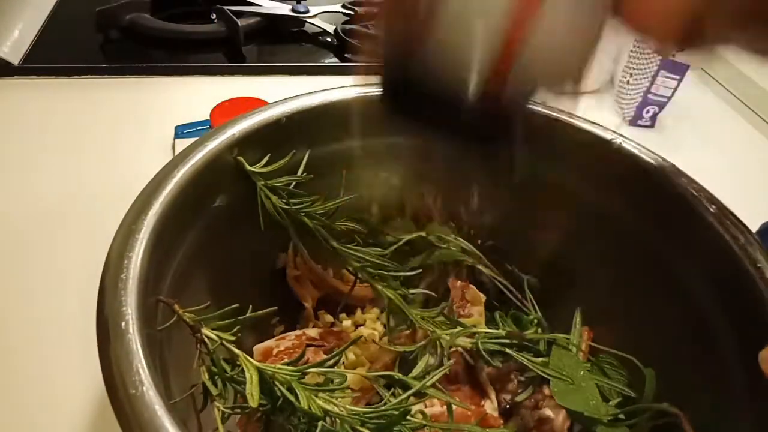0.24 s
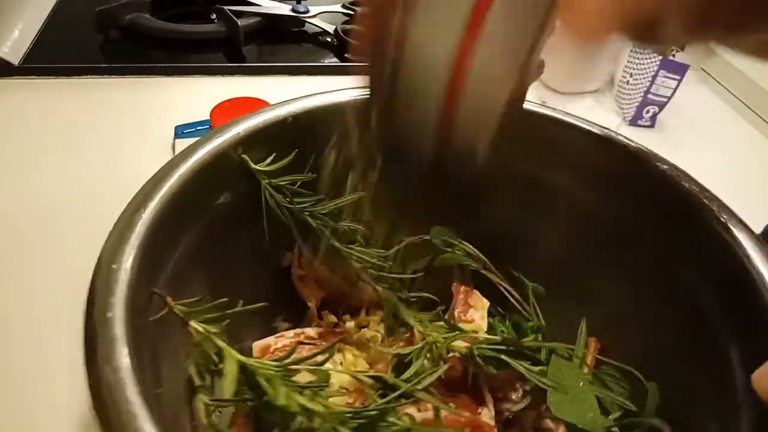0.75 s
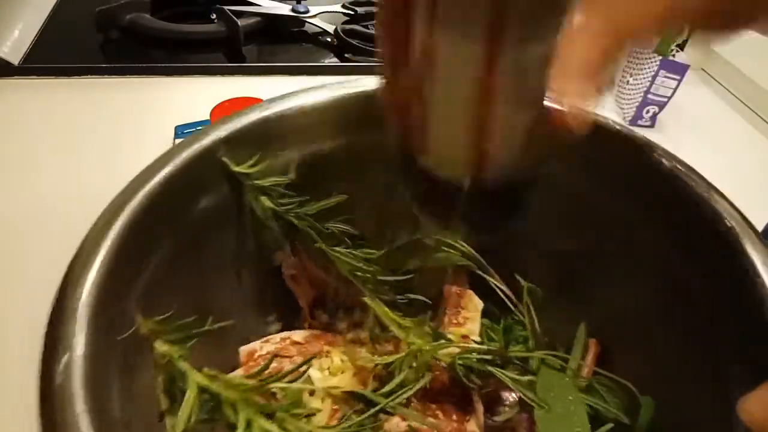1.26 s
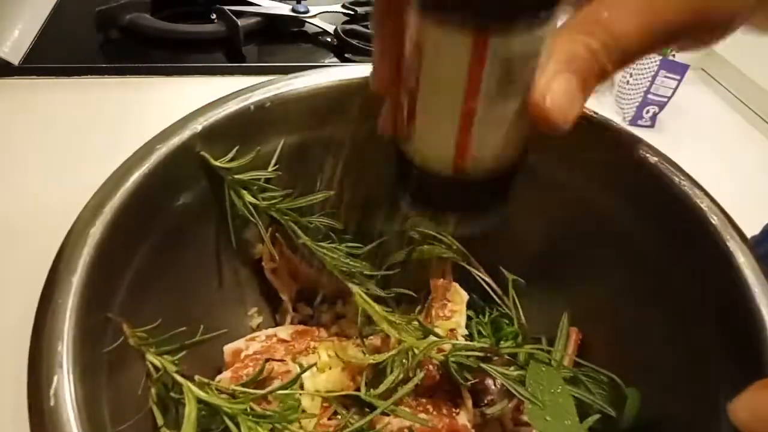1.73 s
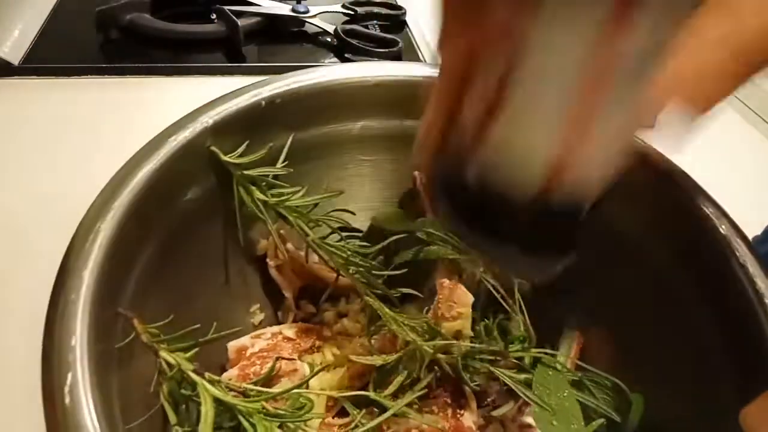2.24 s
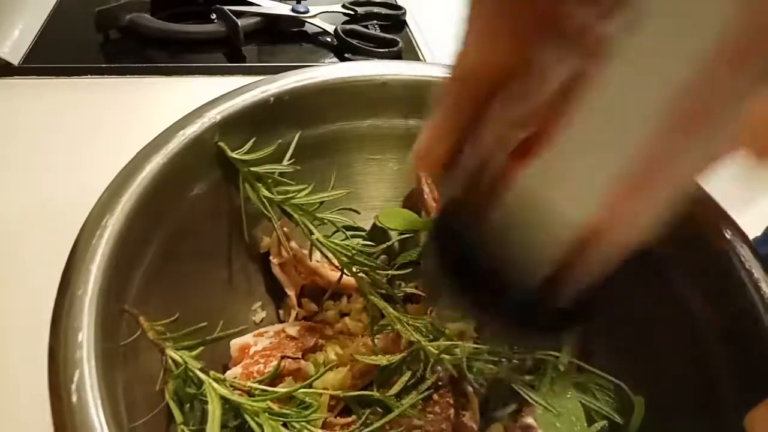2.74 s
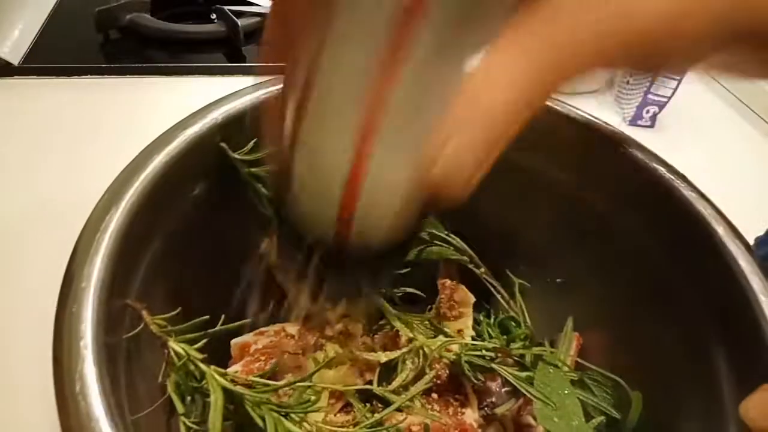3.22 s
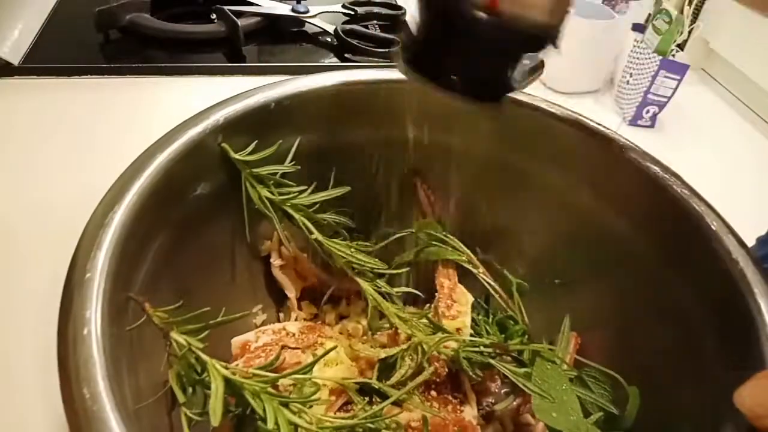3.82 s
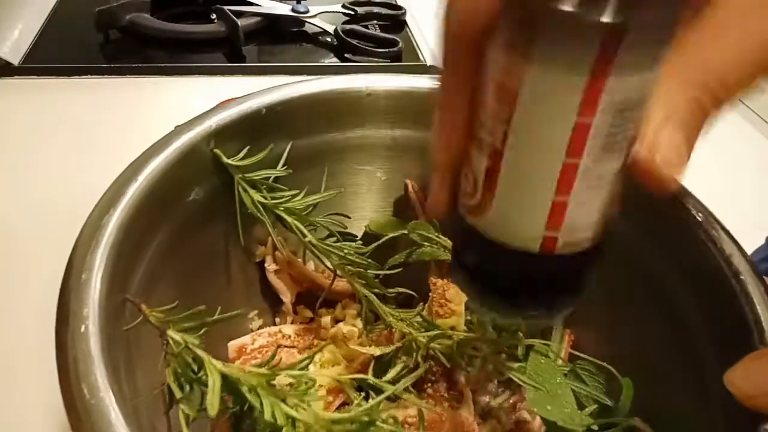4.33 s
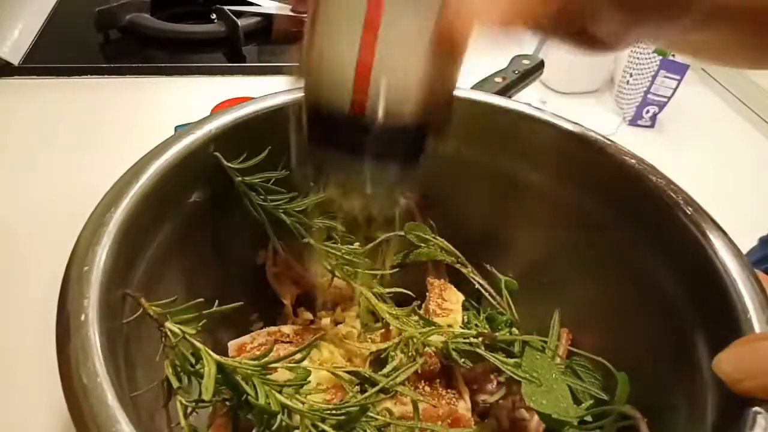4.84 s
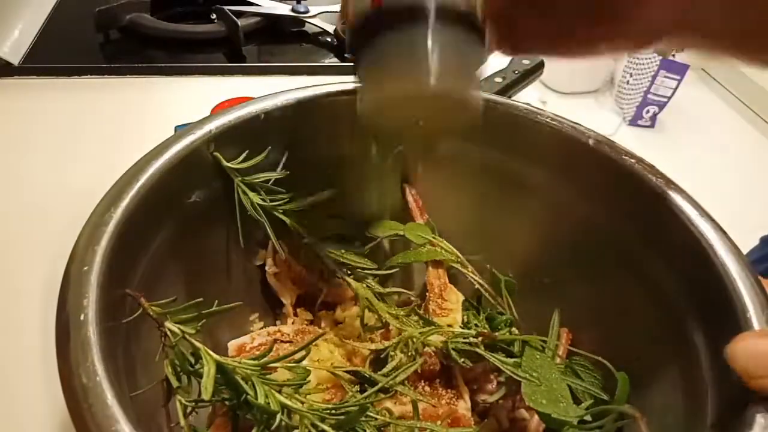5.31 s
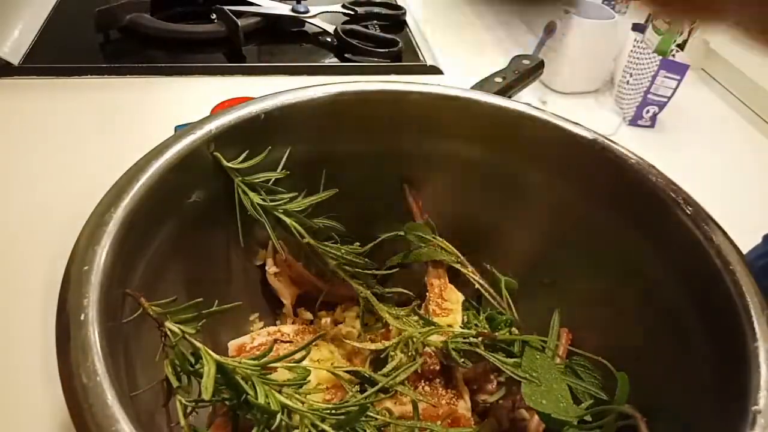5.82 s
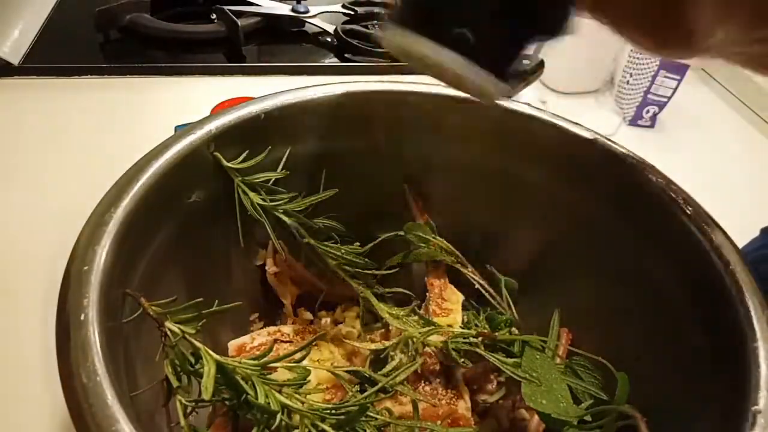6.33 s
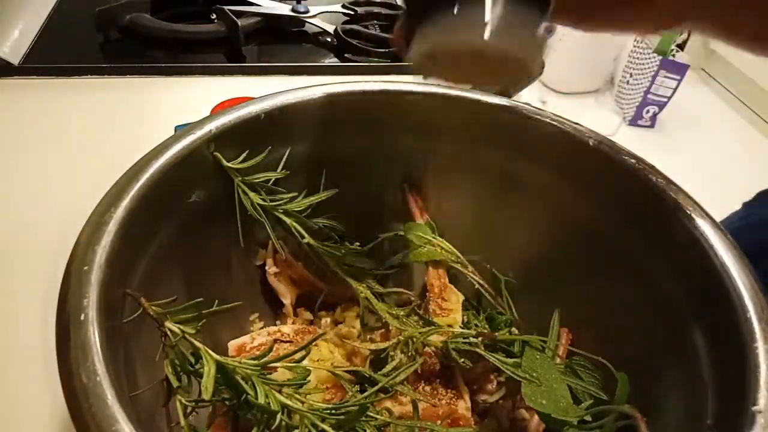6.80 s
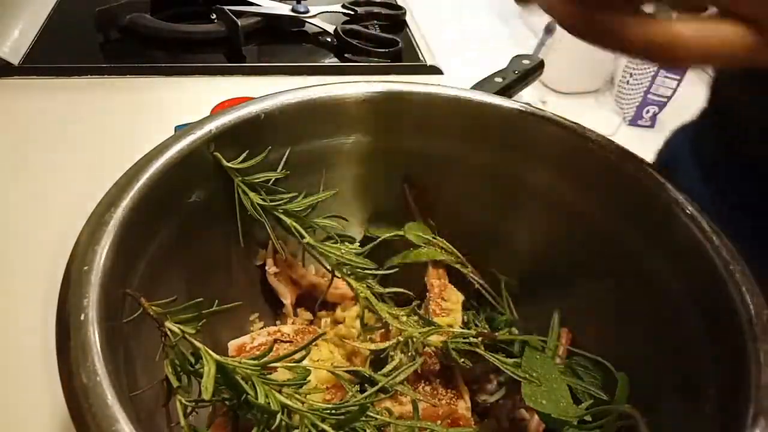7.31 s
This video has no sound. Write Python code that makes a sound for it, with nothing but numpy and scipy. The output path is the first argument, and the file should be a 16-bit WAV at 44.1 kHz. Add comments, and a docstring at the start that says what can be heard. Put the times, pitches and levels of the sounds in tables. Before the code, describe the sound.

Granular seasoning rattles inside a hard plastic jar: short swish, crisp clack and dull knock, packed tightly together and slightly different every time. Strokes run regularly for over four seconds, then come in pairs with gaps, a faint hand rub between. Tiny metallic ticks and fine sprinkling lie far beneath. Close microphone, short small-room tail, faint air and wavering low hum throughout.

```python
"""Seasoning jar over a steel bowl

Small kitchen, heard close: a plastic jar of coarse seasoning is shaken over meat and herbs, about four strokes
a second. Bursts of random grain clicks drive resonances of cap, wall and grains: slides and landing clumps.
A few strays tick through resonances of the steel. A decaying noise tail is the room; under it lie
filtered noise for air and a wavering sine for an appliance hum. The top is cut steeply."""
import sys
import numpy as np
from scipy import signal
from scipy.fft import rfft, irfft
from scipy.io import wavfile
from scipy.ndimage import uniform_filter1d

SR = 44100
rng = np.random.default_rng(int(sys.argv[2]) if len(sys.argv) > 2 else 0)


def generate_wav(sig):
    """Save sig (samples, or channels by samples) to the path in sys.argv[1] as 16-bit PCM at SR."""
    pcm = np.round(np.clip(np.atleast_2d(sig).T, -1, 1) * 32767).astype(np.int16)
    wavfile.write(sys.argv[1], SR, pcm)


N = 333396

# one row per shake: the load slides, part of it slaps the wall with a sizzle of fine grains, its bulk thuds on
# the cap, slap and thud in varying order; levels before trims; the pitch sets where the cap's upper
# resonances are damped and cut:
# start_s, slide_length_s, slide_db, slap_s, slap_db, sizzle_db, thud_s, thud_db, cap_pitch_hz
STROKES = [(0, .004, -39, .0005, -32, -49, .001, -27, 610),
           (.113, .021, -53, .138, -46, -57, .139, -35, 600),
           (.181, .031, -38.5, .197, -27, -44, .188, -12.5, 590),
           (.394, .012, -36, .407, -22, -39, .412, -33, 630),
           (.607, .024, -43.5, .621, -28, -40, .623, -35, 690),
           (.825, .025, -45.5, .832, -37, -51, .848, -42, 660),
           (1.061, .032, -43, 1.075, -34, -53, 1.097, -39, 675),
           (1.296, .050, -49.5, 1.323, -38, -48, 1.314, -42, 670),
           (1.520, .042, -43, 1.5405, -27, -54, 1.546, -39, 630),
           (1.756, .033, -41.5, 1.780, -29, -43, 1.788, -45, 615),
           (1.966, .040, -44, 1.989, -28.5, -47, 1.992, -41, 720),
           (2.177, .046, -44, 2.184, -40, -62, 2.205, -44, 620),
           (2.407, .039, -43.5, 2.4245, -31.5, -62, 2.438, -41, 565),
           (2.607, .070, -46, 2.637, -34, -48, 2.622, -34, 640),
           (2.838, .048, -44.5, 2.856, -34, -55, 2.857, -40, 645),
           (3.066, .020, -38, 3.073, -34, -64, 3.084, -36, 705),
           (3.278, .051, -45, 3.311, -37, -49, 3.320, -42, 580),
           (3.500, .040, -44, 3.533, -32, -49, 3.536, -31, 640),
           (3.693, .035, -45, 3.700, -34, -62, 3.722, -42, 560),
           (3.915, .013, -38.5, 3.9145, -27, -53, 3.921, -45, 615),
           (4.130, .036, -43.5, 4.150, -36.5, -55, 4.166, -39, 590),
           (4.348, .024, -45.5, 4.353, -46, -65, 4.378, -36, 547),
           (4.571, .040, -48.5, 4.584, -46, -70, 4.611, -46, 540),
           (5.007, .036, -46.5, 5.044, -42, -53, 5.043, -46, 550),
           (5.257, .005, -45, 5.265, -39, -70, 5.267, -41, 520),
           (5.905, .020, -41.5, 5.921, -27, -42, 5.922, -26, 510),
           (6.185, .025, -50, 6.191, -38.5, -52, 6.193, -41, 605),
           (6.431, .016, -43, 6.4315, -30, -51, 6.447, -37, 570),
           (6.654, .029, -43.5, 6.663, -31, -51, 6.665, -43, 630)]
# the load shifts without landing while the jar is tipped: start_s, length_s, level_db
SHIFTS = [(.32, .06, -55), (.52, .045, -58), (4.802, .042, -59), (1.45, .035, -61), (5.583, .04, -60),
          (6.911, .044, -62.5), (7.099, .032, -61)]
# stray clicks on the jar: time_s, level_db
CLICKS = [(.3616, -49), (.966, -49), (1.452, -55), (2.361, -47), (3.225, -49), (3.965, -47), (3.989, -51),
          (4.186, -44), (5.42, -58), (6.528, -50), (6.716, -45)]
# resonances of the cap with the air behind it: pitch_hz, width_hz, relative_db
CAP_MODES = [(376, 144, -15.5), (556.7, 62.5, 1.5), (682, 91, 1.5), (800, 78, -3)]
# resonances of the jar wall: pitch_hz, width_hz, relative_db
WALL_MODES = [(1169, 30, -8.5), (1416, 228, -6), (1615, 262, 2), (1780, 250, -2), (2238, 177, -3.5),
              (2583, 270, -6), (3064, 120, -3), (3580, 253, -10), (4400, 580, -15)]
# resonances of the grains: pitch_hz, width_hz, relative_db
GRAIN_MODES = [(6450, 610, 3), (7760, 1210, 1), (12100, 830, -12), (14600, 3800, -17.5)]
# resonances of the steel bowl: pitch_hz, width_hz, relative_db
STEEL_MODES = [(7110, 144, -1), (7300, 83, 3.5), (8150, 310, -6)]
# the clearest stray grains ticking on the steel: time_s, peak_db
TICKS = [(0.05, -49.5), (0.3616, -52), (0.7053, -54.5), (1.8188, -52), (1.8692, -49.5), (3.486, -52),
         (3.6326, -54), (3.799, -50), (4.0238, -55.5), (4.2786, -54)]
# fine seasoning sprinkling down on the steel: time_s, level_db
SPRINKLE = [(0, -81), (.75, -74), (1.2, -83), (1.9, -80), (2.5, -81), (3.1, -85), (3.8, -77), (4.3, -79),
            (4.8, -89), (7.56, -97)]
# decay of the kitchen's tail: pitch_hz, t60_s
KITCHEN_T60 = [(300, 0.25), (600, 0.32), (1500, 0.2), (3000, 0.32), (7000, 0.15), (14000, 0.53)]
# colour of the kitchen's tail: pitch_hz, relative_db
KITCHEN_COLOUR = [(250, -2), (600, 3), (1200, 5), (3000, -1), (7000, 8.5), (14000, -5.5)]
# spectrum of the background air, before it is set to AIR_DB: pitch_hz, relative_db_per_hz
AIR_SPECTRUM = [(20, -20), (45, -31), (70, -9), (135, -7.5), (210, -17), (360, -14.5), (480, -19.5),
                (900, -20.5), (1600, -25), (3200, -27), (4700, -39), (7000, -44), (15500, -44)]
# appliance hum before it wavers: time_s, rms_db
HUM = [(0, -67.5), (.3, -61), (.6, -56.5), (1.0, -67.5), (2.1, -65.5), (3.5, -68), (3.9, -62), (4.3, -65),
       (5.4, -67), (5.7, -62.5), (6.1, -63.5), (7.56, -71.5)]

SLAP_CAP_DB, TOUCH_SIZZLE_DB = -17, -19  # relative to the wall: cap in a slap, sizzle in a light touch
# a heavier thud is softer: the wall takes only a share of its rise
USUAL_THUD_DB, THUD_WALL_DB, THUD_WALL_SHARE = -40, -40, .55
THUD_SIZZLE_DB = -5  # relative to the slap's sizzle
REBOUND_S, REBOUND_DB = .04, -21  # the bulk hops and lands again
TOUCH_S, TOUCH_DB = .007, 1  # grains touch the wall: after the slide's start, above its level
RETURN_S, RETURN_LENGTH_S, RETURN_DB = .13, .05, -29  # the grains roll back as the jar lifts
BRUSH_START_S, BRUSH_LENGTH_S, BRUSH_DB = 5.43, .2, -76  # the hand slips over the jar
SQUEAK_HZ, SQUEAK_WIDTH_HZ, SQUEAK_DB = 3550, 170, 6  # level relative to the hiss
AIR_DB, HUM_HZ, CUTOFF_HZ = -61, 119.3, 15700


def clumps(slap_trim_db=-0.5, thud_trim_db=-1.0):
    """Each shake: light touch, bright slap, hollow thud, close together in varying order; the thud rebounds."""
    out = np.zeros(N)
    for start, _, slide_db, slap_s, slap_db, sizzle_db, thud_s, thud_db, cap_hz in STROKES:
        touch = clump(slide_db, slide_db + SLAP_CAP_DB, slide_db + TOUCH_SIZZLE_DB, cap_hz)
        add(out, start + TOUCH_S, from_db(TOUCH_DB) * touch)
        slap = clump(slap_db + slap_trim_db, slap_db + SLAP_CAP_DB, sizzle_db, cap_hz)
        add(out, slap_s, slap)
        wall_db = THUD_WALL_DB + THUD_WALL_SHARE * (thud_db - USUAL_THUD_DB)
        rebound_s = thud_s + REBOUND_S * rng.uniform(.85, 1.15)
        for s, db in (thud_s, thud_trim_db), (rebound_s, REBOUND_DB):
            thud = clump(wall_db, thud_db, sizzle_db + THUD_SIZZLE_DB, cap_hz)
            add(out, s, from_db(db) * thud)
    return out


def clump(wall_db, cap_db, sizzle_db, cap_hz, crush_s=0.0019, knock=1.7, push=1.0):
    """A clump lands with one knock, a soft push of its weight and a crush of grains lasting milliseconds."""
    t = np.arange(SR // 12) / SR
    force = grains(len(t), 8100, 4.9) * np.exp(-t / crush_s)
    add(force, 0, [knock])
    add(force, 0, push * np.hanning(SR // 900))
    out = 0
    for part, db in zip(jar(force, cap_hz), (wall_db, cap_db, sizzle_db)):
        loudest = np.sqrt(uniform_filter1d(part ** 2, size=128).max())  # rms over about 3 ms
        out = out + from_db(db) * part / loudest
    return out


def jar(force, cap_hz=620, echo_db=-6.5, echo_s=0.0082):
    """What wall, cap and grains radiate; grip, load and the bowl's quick echoes change as the jar moves."""
    t = np.arange(SR // 30) / SR
    echoes = rng.standard_normal(len(t)) * np.exp(-t / echo_s) * (t > .002)
    echoes = echoes / np.linalg.norm(echoes)
    force = force + from_db(echo_db) * signal.fftconvolve(force, echoes)[:len(force)]
    wall_modes = scattered(WALL_MODES, detune=.028, uneven_db=2.0)
    wall = band(resonate(force, wall_modes), 800, 5200, order=3)
    # a heavier load on the cap damps its upper resonances
    loaded = [(hz, width, db - .1 * max(hz - 1.1 * cap_hz, 0)) for hz, width, db in CAP_MODES]
    cap_modes = scattered(loaded, detune=.02, uneven_db=1.0)
    cap = band(resonate(force, cap_modes), 170, 1.5 * cap_hz, order=3)
    sizzle = band(resonate(force, GRAIN_MODES), 5200, 18000)
    return wall, cap, sizzle


def slides(swell_s=0.0047, settle_s=0.011, linger_db=-20.5, linger_s=.035, cap_db=-9.0, sizzle_db=-17.0):
    """The grain stream swells as the load starts to slide, dies as it packs on the cap; a few roll on."""
    out, t = np.zeros(N), np.arange(SR // 5) / SR
    down = [row[:3] for row in STROKES]
    back = [(start + RETURN_S, RETURN_LENGTH_S, db + RETURN_DB) for start, _, db in down]
    for start, length, db in down + back + list(SHIFTS):
        after = np.maximum(t - length, 0)
        swell = 1 - .75 * np.exp(-t / swell_s)
        settling = np.exp(-after / settle_s)
        rolling_on = from_db(linger_db) * np.exp(-after / linger_s)
        flow = swell * (settling + rolling_on)
        wall, cap, sizzle = map(rms_one, jar(flow * grains(len(t), 1900, 4.4)))
        mix = wall + from_db(cap_db) * cap + from_db(sizzle_db) * sizzle
        add(out, start, from_db(db) * np.sqrt(np.mean(flow ** 2)) * mix)
    return out


def clicks(cap_hz=580, cap_db=-8):
    """A stray click on the jar: a small clump with a shorter crush than a landing."""
    out = np.zeros(N)
    for s, db in CLICKS:
        add(out, s, clump(db, db + cap_db, db + TOUCH_SIZZLE_DB, cap_hz, crush_s=.0012))
    return out


def brush(low_hz=3500, high_hz=8500):
    """Skin on plastic: a soft hiss with a thin squeak that swells and fades."""
    out = np.zeros(N)
    swell = np.sqrt(np.hanning(int(BRUSH_LENGTH_S * SR)))
    rub = grains(len(swell), 6000, 3.0)
    hiss = rms_one(band(rub, low_hz, high_hz))
    squeak = rms_one(resonate(rub, [(SQUEAK_HZ, SQUEAK_WIDTH_HZ, 0)]))
    add(out, BRUSH_START_S, from_db(BRUSH_DB) * swell * (hiss + from_db(SQUEAK_DB) * squeak))
    return out


def steel(tick_db=0.0, skitter_s=0.0044):
    """Strays skitter on the bowl over a fine sprinkle; each spot of the steel has its own pitch."""
    out, t = np.zeros(N), np.arange(SR // 20) / SR
    for s, db in TICKS:
        skitter = grains(len(t), 4000, 2.0) * np.exp(-t / skitter_s)
        tick = resonate(skitter, scattered(STEEL_MODES, detune=.025, uneven_db=3.0))
        add(out, s, from_db(db + tick_db) * tick / np.abs(tick).max())
    sprinkle = 0
    for spot in range(12):
        spot_modes = scattered(STEEL_MODES, detune=.035, uneven_db=3.0)
        sprinkle = sprinkle + resonate(grains(N, 16, 5.5), spot_modes)
    return out + level(SPRINKLE) * rms_one(sprinkle)


def kitchen(x, room_db=-15.5):
    """The small room adds a diffuse noise tail that dies band by band."""
    t, edges = np.arange(SR // 2) / SR, np.geomspace(150, 18000, 9)
    white, tail = rng.standard_normal(len(t)) * (t > .008), 0
    for low, high in zip(edges, edges[1:]):
        hz = np.sqrt(low * high)
        decay_db = at_hz(KITCHEN_COLOUR, hz) - 60 * t / at_hz(KITCHEN_T60, hz)
        tail = tail + band(white, low, high) * from_db(decay_db)
    tail = tail / np.linalg.norm(tail)
    return x + from_db(room_db) * signal.fftconvolve(x, tail)[:N]


def background(wander_rad=0.29):
    """Steady shaped air noise and an appliance hum, a sine wavering in level and phase."""
    t = np.arange(N) / SR
    spectrum = rfft(rng.standard_normal(N))
    air = irfft(spectrum * from_db(at_hz(AIR_SPECTRUM, np.fft.rfftfreq(N, 1 / SR))), N)
    waver = 1 + .45 * drift(16)
    tone = np.sqrt(2) * np.sin(2 * np.pi * HUM_HZ * t + wander_rad * drift(4))
    return from_db(AIR_DB) * rms_one(air) + level(HUM) * waver * tone


def grains(size, per_s, spread_db):
    """Random clicks of either sign and uneven strength."""
    born = rng.random(size) < per_s / SR
    strength = from_db(spread_db * np.minimum(rng.exponential(1, size), 4))
    return born * rng.choice([-1, 1], size) * strength


def resonate(x, modes):
    """Parallel two-pole resonances of alternating sign; a wider one dies sooner."""
    out = 0
    for k, (hz, width, db) in enumerate(modes):
        r = np.exp(-np.pi * width / SR)
        gain = (-1) ** k * from_db(db) * (1 - r * r) / 2
        poles = [1, -2 * r * np.cos(2 * np.pi * hz / SR), r * r]
        out = out + gain * signal.lfilter([1, 0, -1], poles, x + 1e-18)
    return out


def scattered(modes, detune, uneven_db):
    """Each contact finds the resonances a little shifted and differently strong."""
    return [(hz * (1 + detune * rng.normal()), width, db + uneven_db * rng.normal())
            for hz, width, db in modes]


def band(x, low_hz, high_hz, order=2):
    """Butterworth band-pass."""
    sos = signal.butter(order, [low_hz, min(high_hz, .45 * SR)], "band", fs=SR, output="sos")
    return signal.sosfilt(sos, x + 1e-18)


def drift(rate):
    """Normal random values of spread 1, `rate` per second, joined by straight lines."""
    return np.interp(np.arange(N) / SR * rate, np.arange(1000), rng.standard_normal(1000))


def level(rows):
    """A table of time_s, level_db as a gain at every sample."""
    return from_db(np.interp(np.arange(N) / SR, *np.transpose(rows)))


def at_hz(points, hz):
    """Read a table on a log-frequency axis."""
    table_hz, values = np.transpose(points)
    return np.interp(np.log(hz + 1e-9), np.log(table_hz), values)


def from_db(db):
    """Decibels to gain."""
    return 10 ** (np.asarray(db) / 20)


def rms_one(x):
    """Scale to an rms of 1."""
    return x / np.sqrt(np.mean(x ** 2) + 1e-20)


def add(out, s, sound):
    """Mix a sound in at a time in seconds."""
    i = max(0, round(s * SR))
    out[i:i + len(sound)] += sound[:N - i]


def scene():
    """Jar, hand and bowl sound in the kitchen, over its air and hum."""
    close = clumps() + slides() + clicks() + brush() + steel()
    return (kitchen(close) + background())[None]


def record(dry):
    """The microphone's signal is cut steeply at the top by an elliptic low-pass."""
    return signal.sosfilt(signal.ellip(10, .1, 80, CUTOFF_HZ, fs=SR, output="sos"), dry)


dry = scene()
out = record(dry)
generate_wav(out)
```